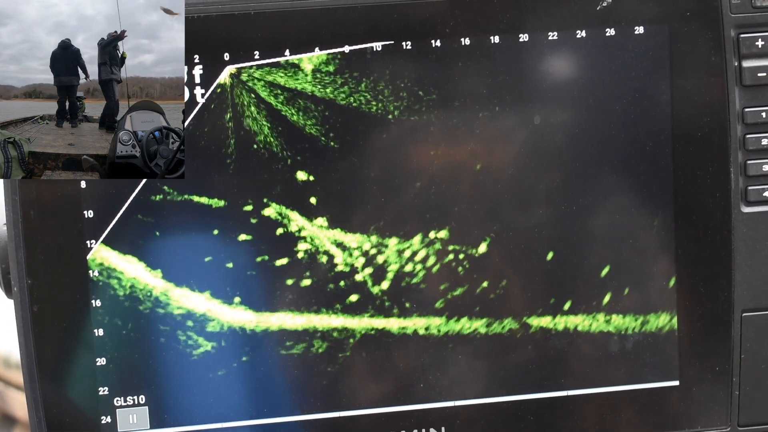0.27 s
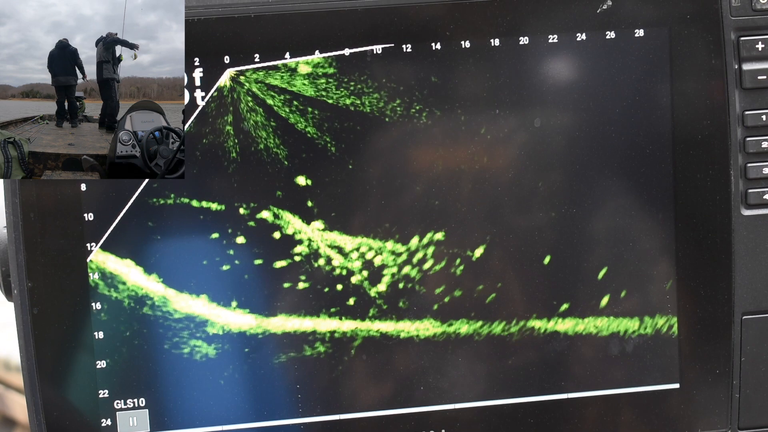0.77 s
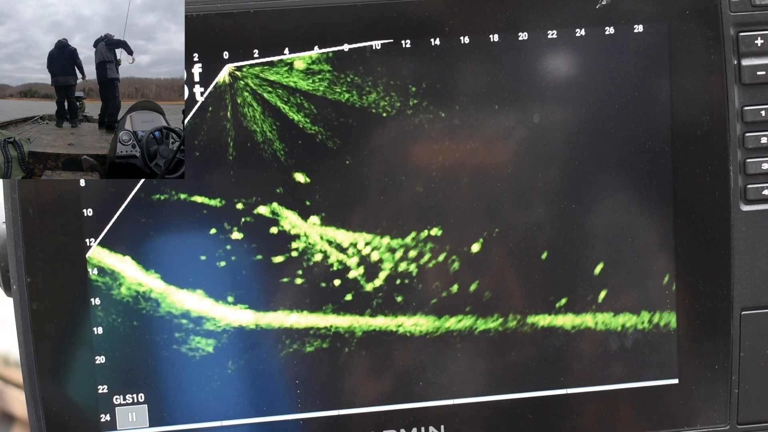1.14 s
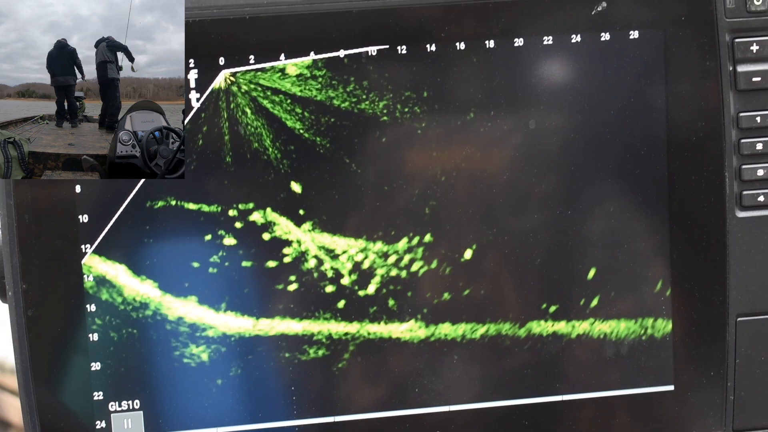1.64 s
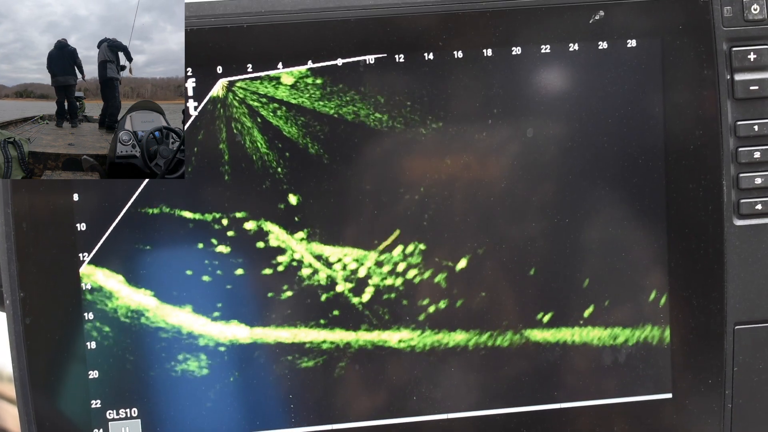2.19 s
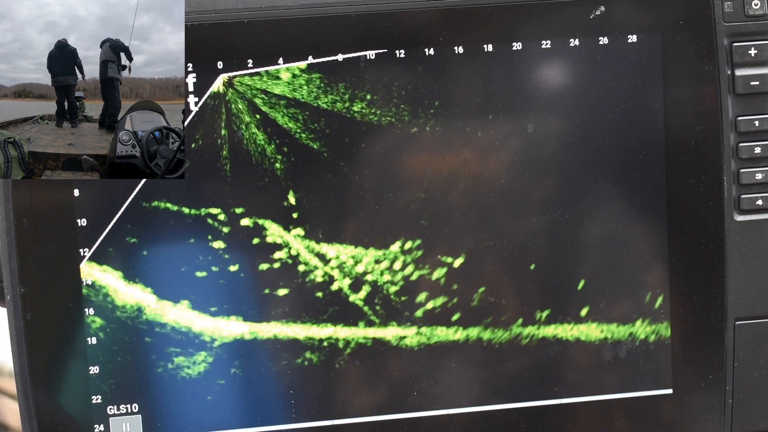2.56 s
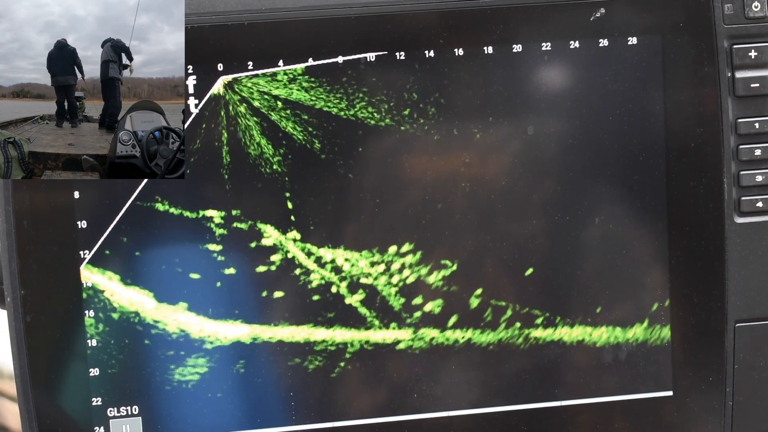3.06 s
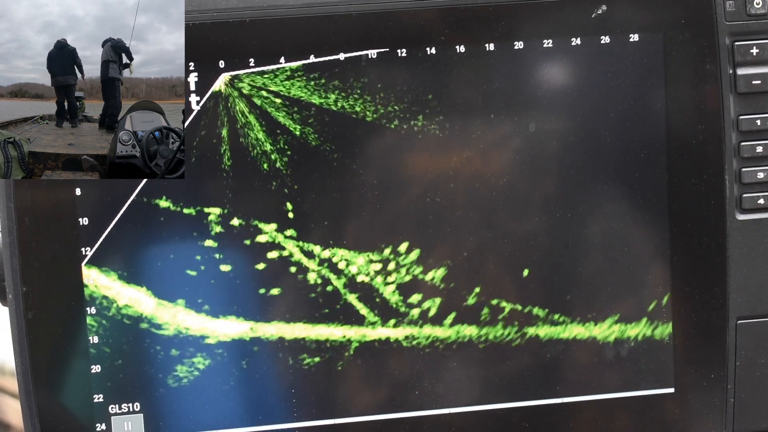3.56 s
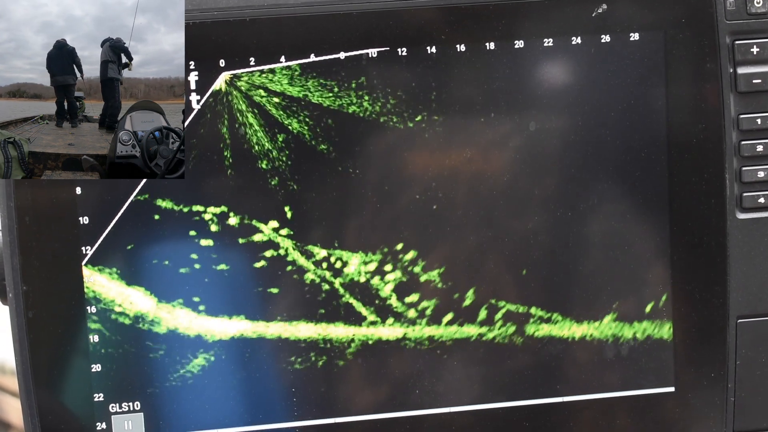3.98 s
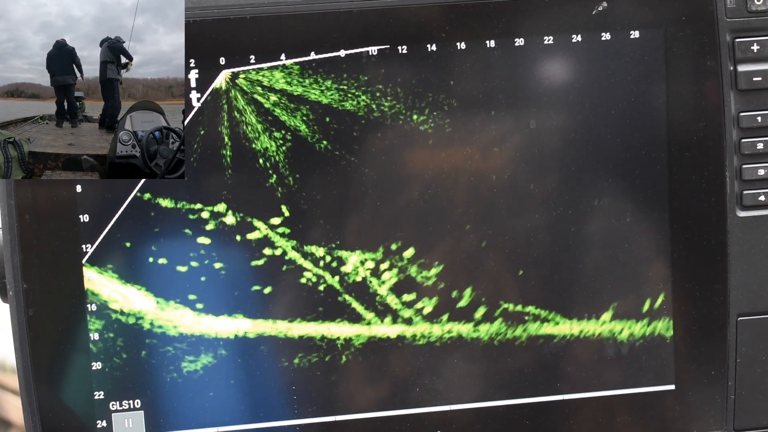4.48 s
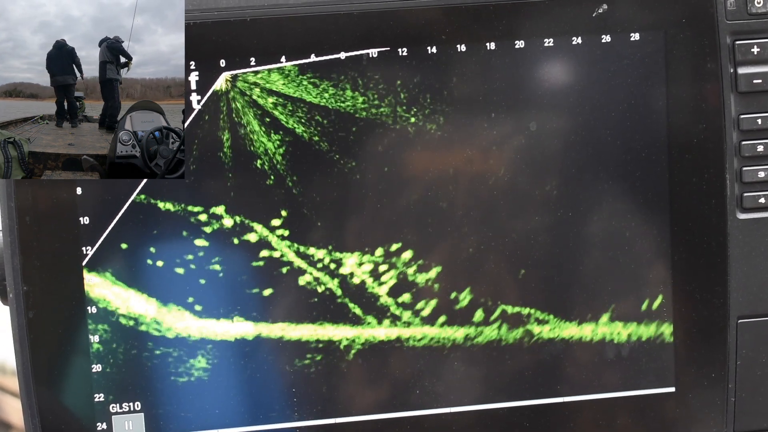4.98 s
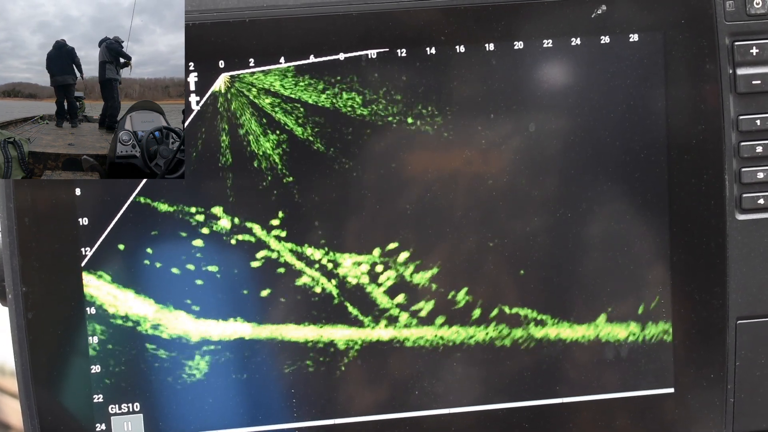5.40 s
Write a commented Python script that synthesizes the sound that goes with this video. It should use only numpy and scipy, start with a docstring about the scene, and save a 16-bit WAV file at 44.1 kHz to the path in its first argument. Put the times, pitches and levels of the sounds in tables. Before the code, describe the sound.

Quiet water slaps beneath an aluminium boat; light ticks and cloth swishes, then a soft thump and a loud, boomy deck knock.

```python
"""On the deck of a small aluminium fishing boat drifting on a lake, microphone pair standing on the deck.
From the start wavelets lap close by: ringing air pockets and noisy slaps under the plating. Light clicks of
tackle, drops, a sole and lap edges (cracks with a brief ring) and swishes of clothing and line come and go.
About 1.5 s in a soft thump, then at 1.7 s one heavy knock, excite the decaying modes of the hull; lapping goes
on to the end. Hull drone, rumble, ripple and a high hiss with a rustle (wavering noise) lie underneath."""
import sys
import numpy as np
from scipy import signal
from scipy.fft import rfft, irfft, next_fast_len
from scipy.io import wavfile
from scipy.ndimage import uniform_filter1d

SR = 44100
rng = np.random.default_rng(int(sys.argv[2]) if len(sys.argv) > 2 else 0)


def put_to_file(sound):
    """Save the sound as 16-bit audio at rate SR, in the file named by the first command-line argument."""
    columns = np.atleast_2d(sound).T  # one column per channel
    safe = np.clip(columns, -1, 1)
    whole_steps = np.round(safe * 32767)
    wavfile.write(sys.argv[1], SR, whole_steps.astype(np.int16))


N = 249165  # length [samples]
HIT = np.arange(32768) / SR  # time axis of one short event [s]

# Blows on the deck:
# (time [s], level [dB], contact time [ms], plating rattle [dB], struck spot along the deck [0-1])
KNOCKS = [(1.484, -2.5, 20, -37, 0.93), (1.516, -13, 1.8, -27, 0.92), (1.531, -29.5, 0.47, -27.5, 1),
          (1.533, -8, 9.7, -33, 0.82), (1.7213, 0.5, 0.24, -19.5, 0.95), (1.767, -7, 4.7, -26, 0.97)]
# Modes the deck and hull ring with: (frequency [Hz], relative level [dB], t60 [s])
HULL_MODES = [(42.7, -14, 0.26), (75, -10.5, 0.92), (83.2, -15.5, 0.72), (114, -7.5, 0.71),
              (153.6, -13.5, 0.23), (174, -17, 0.48), (183.8, -4, 0.22), (254.5, -5.5, .17),
              (270.3, -18, 0.56), (297, -10, 0.11), (338.3, -11.5, 0.17), (490, -17, 0.13),
              (566, -10, 0.11), (610, -37, 0.098), (675, -26.5, 0.14), (876, -24, 0.14)]
# Spectrum of the dense higher modes of the plating: (frequency [Hz], level [dB])
PLATING_SPECTRUM = [(60, -12), (150, 9.5), (310, 2), (420, -8.5), (600, -7.5), (780, -13), (1200, -16.5),
                    (2000, -26), (5000, -34.5), (8000, -42.5), (14000, -62)]
# Spectrum of the air in the hollow under the deck: (frequency [Hz], level [dB])
HOLLOW_SPECTRUM = [(25, -23), (45, -3), (80, 4.5), (120, 0.5), (180, -6), (400, -47), (1500, -96)]
# Wavelets trapping air under the hull:
# (time [s], pocket pitch [Hz], gurgle level [dB], slap and nudge offset from it [dB], swell time [ms])
LAPS = [(0.043, 766, -50, -5, 6), (0.126, 2020, -45.5, 5, 3.4), (0.148, 1094, -49.5, 7.5, 1.3),
        (0.158, 533, -34, -24, 8.4), (0.570, 1090, -49, -16, 3.4), (0.581, 760, -44.5, -10, 5.7),
        (1.69, 1277, -34, -15.5, 3.4), (1.827, 999, -40, -14, 1.2), (2.451, 1172, -49.5, -20, 1.1),
        (2.611, 1790, -45.5, -3, 3.2), (2.630, 1850, -55.5, 1, 2.4), (2.916, 494.5, -40, -9.5, 6),
        (2.945, 1130, -45, -6, 1.3), (2.946, 2190, -48, -23, 0.81), (3.240, 1490, -55.5, -11.5, 5),
        (3.571, 970, -37.5, -8.5, 2.5), (3.952, 789, -42, 2.5, 3), (4.266, 1855, -35, -11, 2.6),
        (4.277, 1011, -36.5, -15.5, 3.5), (4.585, 866, -41.5, -6, 5.6), (4.670, 1230, -53.5, 1.5, 3),
        (4.900, 1128, -43.5, -2, 2.7), (4.919, 735, -42.5, -7, 3), (5.041, 840, -47, -4, 3.5),
        (5.214, 1334, -32, -10, 6.6), (5.636, 1246, -29, -20, 8.5)]
# Modes the side panels ring with: (frequency [Hz], relative level [dB], t60 [s])
PANEL_MODES = [(672, 1.5, 0.37), (982, -12, 0.31), (1030, -10.5, 0.22), (1240, -6, 0.2), (1420, -15, 0.63),
               (1630, -10, 0.18), (1820, -16, 0.17)]
# Spectrum of the broad slap of water on the plating: (frequency [Hz], level [dB])
SLAP_SPECTRUM = [(80, -12), (200, 14.5), (400, 6.5), (650, 9.5), (900, 0), (1250, 3), (2000, -8.5),
                 (3200, -20), (4200, -24), (7000, -21.5), (14000, -42.5)]
# Light clicks of tackle and drops, a shoe sole's slap, bright edges of a lap:
# (time [s], ring pitch [Hz], ring level [dB], crack level [dB], t60 of crack and deck smear [s])
TICKS = [(0.059, 8900, -49, -52, 0.005), (0.542, 4700, -46.5, -51, 0.097), (0.662, 8400, -51.5, -52, 0.006),
         (0.893, 1705, -42.5, -39.5, 0.079), (1.119, 4530, -39, -41.5, 0.097),
         (1.215, 4180, -51, -52, 0.077), (1.4944, 7650, -42, -27.5, 0.01), (1.496, 5480, -44, -31, 0.082),
         (1.986, 3680, -53.5, -49, 0.063), (2.090, 6750, -50, -51.5, 0.11), (2.125, 3830, -44.5, -52, 0.12),
         (2.148, 5270, -45, -58, 0.063), (2.19, 3930, -48, -51, 0.14), (2.198, 5200, -37.5, -41.5, 0.024),
         (2.530, 3130, -55.5, -61, 0.25), (2.727, 4800, -44, -43, 0.086), (2.8821, 2280, -39.5, -45, 0.033),
         (2.882, 7700, -42, -45, 0.049), (3.071, 4090, -59, -55, 0.079), (3.368, 6420, -47, -54, 0.14),
         (3.606, 3620, -56, -55.5, 0.15), (4.266, 3150, -51.5, -56.5, 0.076), (4.279, 6100, -54, -72, 0.11)]
# Spectrum of the crack of a click: (frequency [Hz], level [dB])
CRACK_SPECTRUM = [(200, 1.5), (500, 3.5), (780, -8.5), (1200, 4), (3000, 1), (5000, 2), (7500, -6.5),
                  (9500, -19.5), (12500, -18.5), (15000, -46)]
# Soft swishes of clothing and line: (time [s], relative level [dB], t60 [s])
BRUSHES = [(0.298, -52, 0.3), (0.719, -49, 0.32), (1.012, -51, 0.88), (1.099, -57, 0.82), (2.36, -48, 0.13),
           (2.96, -60.5, 0.86), (3.638, -52, 0.52)]
# Spectrum of the swishes: (frequency [Hz], level [dB])
CLOTH_SPECTRUM = [(900, -7.5), (1600, -4), (3000, -8.5), (5000, -5.5), (7500, -11), (9000, -17.5),
                  (12300, -21), (14500, -37)]
# Spectrum of the water rippling along the hull: (frequency [Hz], level [dB])
RIPPLE_SPECTRUM = [(350, -1.5), (560, 5.5), (820, -6.5), (1100, 3), (1400, 3), (2300, -6), (3200, -23),
                   (6000, -57)]
# Spectrum of the hull drone, also heard when a wave nudges the hull: (frequency [Hz], level [dB])
DRONE_SPECTRUM = [(60, -14.5), (100, -18), (150, 3.5), (195, 2.5), (280, -7), (420, -12), (800, -59.5)]
# Spectrum of the rumble of the rocking hull: (frequency [Hz], level [dB])
RUMBLE_SPECTRUM = [(15, -24), (28, 14), (60, 9.5), (110, 9.5), (170, -11), (400, -55)]
# The hull rocks in slow swells: (time [s], rumble level [dB])
SWELL = [(0, -56), (.4, -51.5), (.75, -60.5), (2.35, -52.5), (2.9, -49), (3.4, -57), (4.0, -54.5),
         (4.5, -62), (5.3, -51), (5.65, -62)]
# The high hiss and a rustle rise and fall together: (time [s], shared level [dB])
HISS_LEVEL = [(0.0, -64), (0.64, -60.5), (1.6, -64), (1.92, -70), (2.06, -70), (2.23, -62.5), (2.53, -70),
              (2.77, -69.5), (2.91, -61), (3.08, -72.5), (3.32, -71), (3.6, -68), (4.12, -66.5),
              (4.34, -71), (5.16, -71.5), (5.35, -68), (5.65, -67)]
# Spectrum of the high hiss, perhaps of the microphones: (frequency [Hz], level [dB])
HISS_SPECTRUM = [(2500, -33), (4000, 0), (5200, 3.5), (7600, 0.5), (8600, -7.5), (12300, -12), (14200, -40)]
# Spectrum of the rustle: (frequency [Hz], level [dB])
RUSTLE_SPECTRUM = [(1400, -1.5), (2400, 2.5), (3000, -0.5), (4200, -8), (6000, -14.5), (12000, -24)]
# How unlike the two microphones hear: (frequency [Hz], gain of the side signal [dB])
SIDE_WIDTH = [(60, -24), (250, -13.5), (500, -11), (1000, -7), (2000, -7), (4000, -8.5), (8000, -11.5),
              (12000, -6)]

# A blow is broad, so even a mode with a node at the struck spot swings this much
NODE_DB = -9
# Rumble of the hollow under the deck, relative to the blow
HOLLOW_DB, HOLLOW_RISE_S, HOLLOW_T60_S = -26.5, 0.045, 0.96
# A bigger pocket is lower and rings on longer: t60 at 1 kHz, and the power of pitch by which it shortens
LAP_T60_S, LAP_T60_SLOPE = 0.24, 0.65
# The pocket dies 60 dB in some cycles of its starting pitch while the pitch climbs
POCKET_CYCLES, POCKET_OCTAVES_PER_S = 47.4, 1.4
# Fainter, shorter bubbles fall within this spread
BUBBLES_DB, BUBBLE_SPREAD_S = -10, 0.028
# The bulk of each wave nudges the hull
NUDGE_RISE_S, NUDGE_T60_S, NUDGE_DB = 0.027, 0.54, 1.5
# Random faint clicks: lowest pitch (they spread over an octave), level, t60
FAINT_TICK_HZ, FAINT_TICK_DB, FAINT_TICK_T60_S = 3650, -62.5, 0.057
BRUSH_RISE_S = 0.011
# The water ripples on, a little louder when the hiss is (dB gained per dB of shared hiss level)
RIPPLE_DB, RIPPLE_FOLLOWS = -59.5, 0.27
DRONE_DB = -52.5
# Hiss and rustle, relative to their shared level
HISS_DB, RUSTLE_DB = -0.5, 1.05
TOP_HZ = 14000  # upper limit of the recorder


def knocks():
    """Each blow pushes the deck for a moment; a longer push wakes only the lowest modes."""
    out = np.zeros((2, N))
    modes = np.array([undb(db) * ring(hz, t60, 0.00045) for hz, db, t60 in HULL_MODES])
    # the weight settles on the deck and checks its swing
    modes = modes * undb(np.interp(HIT, [0.118, 0.132], [0, -8]))
    for s, db, contact_ms, rattle_db, spot in KNOCKS:
        # the struck spot decides how far, and which way, each mode swings
        swing = np.cos(np.pi * spot * np.arange(len(modes)))
        swing = np.copysign(np.maximum(np.abs(swing), undb(NODE_DB)), swing)
        hull = swing @ modes
        push = np.sin(np.pi * np.minimum(HIT * 1000 / contact_ms, 1))
        pushed = signal.fftconvolve(hull, push / push.sum())[:len(HIT)]
        boom = signal.hilbert(undb(db) * pushed)
        boom = np.array([boom.real, 0.5 * boom.imag])  # the microphones differ a little in phase
        rattle_fade = fade(0.091, 0.00064) + undb(-3.5) * fade(0.31, 0.0096)
        rattle = noise(PLATING_SPECTRUM, len(HIT)) * rattle_fade
        hollow = noise(HOLLOW_SPECTRUM, len(HIT)) * fade(HOLLOW_T60_S, HOLLOW_RISE_S)
        add(out, s, boom + undb(rattle_db) * rattle + undb(db + HOLLOW_DB) * hollow)
    return out


def laps():
    """A wavelet slaps the hull; its trapped air rings with bubbles around its pitch, and the plating rings on."""
    out = np.zeros((2, N))
    for s, hz, db, slap_db, swell_ms in LAPS:
        t60 = LAP_T60_S * (1000 / hz) ** LAP_T60_SLOPE
        pocket = ring(hz, POCKET_CYCLES / hz, 2 / hz, glide=POCKET_OCTAVES_PER_S)
        for late, detune in zip(rng.random(6), rng.uniform(-0.89, 1, 6)):
            bubble_hz = hz * 2 ** (0.36 * detune)
            bubble = ring(bubble_hz, 22 / bubble_hz, 0.00025)
            pocket = pocket + undb(BUBBLES_DB) * np.roll(bubble, int(late * BUBBLE_SPREAD_S * SR))
        # the water closes on the plating gradually
        swell = 1 - np.exp(-(HIT * 1000 / swell_ms) ** 2)
        gurgle = peak_level(scatter(pocket, t60, wet_db=-5.0) * swell, db, size=882)
        slap = noise(SLAP_SPECTRUM, len(HIT)) * fade(1.03 * t60, 0.0027) * swell
        # the nudge of the wave's bulk builds up more slowly
        nudge = noise(DRONE_SPECTRUM, len(HIT)) * fade(NUDGE_T60_S, NUDGE_RISE_S)
        add(out, s, gurgle + undb(db + slap_db) * (undb(3.5) * slap + undb(NUDGE_DB) * nudge))
    return out


def panels(x):
    """The side panels sing along with the sound sent into them, each mode as a decaying resonance."""
    response = np.zeros(len(HIT))
    for hz, db, t60 in PANEL_MODES:
        response += undb(db) * 2 * ring(hz, t60, 0.0005) / fade(t60, 0.0005).sum()
    return x + signal.fftconvolve(x, response[None], axes=1)[:, :N]


def ticks():
    """A short crack and a brief ring of three close partials, the ring smeared by the deck."""
    out = np.zeros((2, N))
    for s, hz, ring_db, crack_db, t60 in TICKS + faint_ticks(count=10):
        partials = hz * np.array([1, rng.uniform(0.682, 1.0), rng.uniform(1.0, 1.332)])
        ping_t60 = min(t60 * 0.084, 50 / hz)
        ping = sum(undb(db) * ring(f, ping_t60, 0.0021) for f, db in zip(partials, [0, -7, -8]))
        ping = peak_level(scatter(ping, t60, wet_db=0.5), ring_db, size=220)
        # the contact chatters: its strength changes every 1.5 ms
        chatter = undb(2 * np.repeat(rng.standard_normal(len(HIT) // 64), 64))
        crack = noise(CRACK_SPECTRUM, len(HIT)) * fade(t60, t60 / 60) * chatter
        add(out, s, ping + undb(crack_db + 2.0) * crack)  # all cracks 2 dB up
    return out


def faint_ticks(count):
    """Rows like those of TICKS for faint clicks that fall at random."""
    return [(when * N / SR, FAINT_TICK_HZ * 2 ** pitch, FAINT_TICK_DB, FAINT_TICK_DB, FAINT_TICK_T60_S)
            for when, pitch in rng.random((count, 2))]


def brushes():
    """Sleeves and line brush past: short swishes of noise whose strength jumps every 6 ms."""
    out = np.zeros((2, N))
    for s, db, t60 in BRUSHES:
        grain = undb(2 * np.repeat(rng.standard_normal(len(HIT) // 256), 256))
        swish = noise(CLOTH_SPECTRUM, len(HIT)) * fade(t60, BRUSH_RISE_S) * grain
        add(out, s, undb(db) * swish)
    return out


def water_ripple(hiss_gain):
    """Wavering noise and tiny ringing bubbles along the waterline, a little louder when the hiss is."""
    ripple = noise(RIPPLE_SPECTRUM, N) * undb(1.4 * walk(12))
    ripple = ripple + undb(-15) * droplets(900, 2360, cycles=47, count=260)
    follow = (hiss_gain / hiss_gain.mean()) ** RIPPLE_FOLLOWS
    return undb(RIPPLE_DB) * follow * ripple


def hull_drone():
    """A faint wavering drone, and a deeper rumble that comes in slow swells as the hull rocks."""
    drone = noise(DRONE_SPECTRUM, N) * undb(2.9 * walk(22))
    rumble = noise(RUMBLE_SPECTRUM, N) * undb(2.44 * walk(4.3))
    return undb(DRONE_DB) * drone + gain_curve(SWELL) * rumble


def hiss_and_rustle(hiss_gain):
    """A high hiss, perhaps of the microphones, rising and falling along with a faster, grainy rustle."""
    hiss = noise(HISS_SPECTRUM, N) * undb(1.2 * walk(4.81))
    rustle = noise(RUSTLE_SPECTRUM, N) * undb(1.2 * walk(25.49))
    rustle = rustle + undb(-11.0) * droplets(2440, 7360, cycles=26, count=220)
    return hiss_gain * (undb(HISS_DB) * hiss + undb(RUSTLE_DB) * rustle)


def background():
    """The continuous bed under the events: water, hull, hiss and rustle."""
    hiss_gain = gain_curve(HISS_LEVEL)
    return water_ripple(hiss_gain) + hull_drone() + hiss_and_rustle(hiss_gain)


def droplets(low_hz, high_hz, cycles, count):
    """Tiny decaying pings at random times, pitches, strengths and sides, together rms 1."""
    out, t = np.zeros((2, N)), HIT[:2048]
    for when, pitch, size, side in rng.random((count, 4)):
        hz = low_hz * (high_hz / low_hz) ** pitch
        grain = np.sin(2 * np.pi * hz * t) * np.exp(-np.log(1000) * hz * t / cycles)
        add(out, when * N / SR, undb(16 * size ** 2) * np.outer([1, 4 * side - 2], grain))
    return unit(out)


def walk(rate):
    """Slow random wavering, `rate` new values a second joined by straight lines."""
    knots = rng.standard_normal(400)
    return 1.02 * np.interp(np.arange(N) / SR * rate, np.arange(len(knots)), knots)


def gain_curve(points):
    """A (time [s], level [dB]) curve as a gain for every sample."""
    return undb(np.interp(np.arange(N) / SR, *np.transpose(points)))


def undb(db):
    """Decibels to gain."""
    return 10 ** (np.asarray(db) / 20)


def unit(x):
    """Scale to rms 1."""
    return x / np.sqrt(np.mean(x ** 2))


def colour(x, points):
    """Shape a sound by a (frequency [Hz], level [dB]) curve, interpolated over log frequency."""
    hz, db = np.transpose(points)
    n = next_fast_len(x.shape[-1])
    f = np.maximum(np.arange(n // 2 + 1) * SR / n, 1)
    gain = undb(np.interp(np.log(f), np.log(hz), db))
    return irfft(rfft(x, n) * gain, n)[..., :x.shape[-1]]


def noise(points, size):
    """Coloured noise, mid and side unrelated, rms 1."""
    return unit(colour(rng.standard_normal((2, size)), points))


def fade(t60, rise):
    """Envelope of a hit: rises with time constant `rise` [s], then dies 60 dB in `t60` [s]."""
    return (1 - np.exp(-HIT / rise)) * np.exp(-np.log(1000) * HIT / t60)


def ring(hz, t60, rise, glide=0):
    """A dying sine whose pitch may climb by `glide` octaves a second, one octave at most."""
    pitch = hz * 2 ** np.clip(glide * HIT, -1, 1)
    return fade(t60, rise) * np.sin(2 * np.pi * np.cumsum(pitch) / SR)


def scatter(x, t60, wet_db):
    """Send a short ring through the metal: it arrives directly and again as a dense dying tail (mid, side)."""
    paths = rng.standard_normal((2, len(HIT))) * fade(t60, 0.003)
    tail = signal.fftconvolve(x[None], paths, axes=1)[:, :len(HIT)]
    tail = undb(wet_db) * np.array([unit(row) for row in tail])
    direct = unit(x) * np.array([[1], [0]])  # mid only
    return tail + direct


def peak_level(x, db, size):
    """Set the loudest stretch of `size` samples in the mid signal to an rms level."""
    return x * undb(db) / np.sqrt(uniform_filter1d(x[0] ** 2, size).max())


def add(track, s, x):
    """Mix a sound into the track at time s [s]."""
    i = int(np.clip(s * SR, 0, N - 1))
    track[:, i:i + x.shape[-1]] += x[:, :N - i]


def scene():
    """All sources as mid and side; the close microphones hear the bass nearly alike."""
    water = undb(-0.5) * panels(laps())
    mid, side = knocks() + water + ticks() + brushes() + background()
    side = colour(side, SIDE_WIDTH)
    return np.array([mid + side, mid - side])


def record(dry):
    """The recorder drops the deepest rumble, rounds the highest peaks and cuts the top."""
    low_cut = signal.butter(2, 22, "high", fs=SR, output="sos")
    dry = signal.sosfilt(low_cut, dry)
    dry = dry / (1 + (dry / 0.85) ** 4) ** 0.25
    top_cut = signal.ellip(8, 0.2, 70, TOP_HZ, fs=SR, output="sos")
    return signal.sosfilt(top_cut, dry)


dry = scene()
out = record(dry)
put_to_file(out)
```